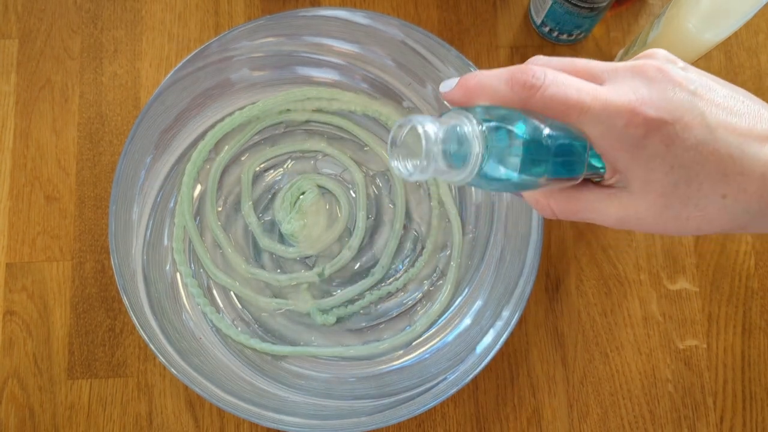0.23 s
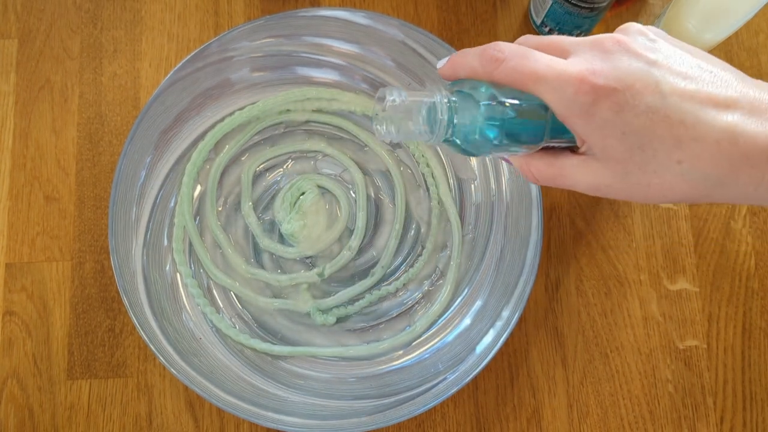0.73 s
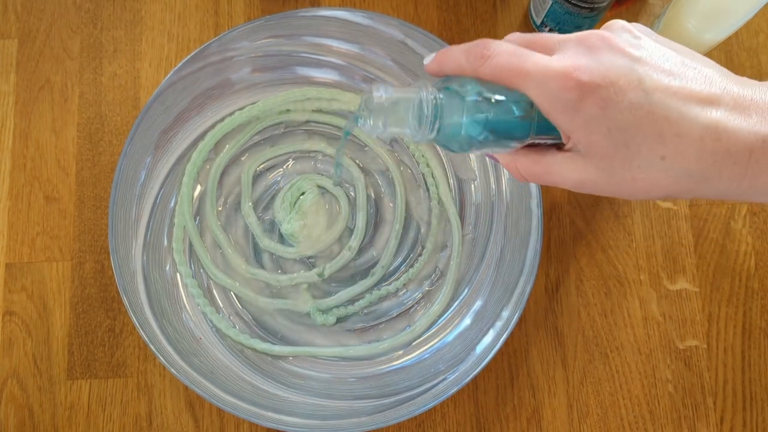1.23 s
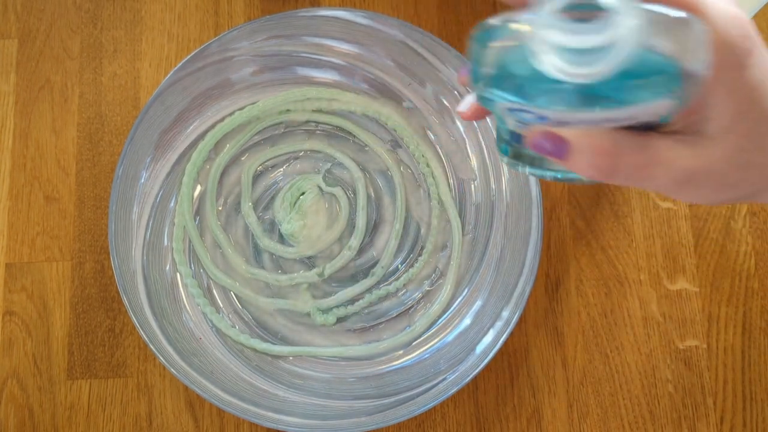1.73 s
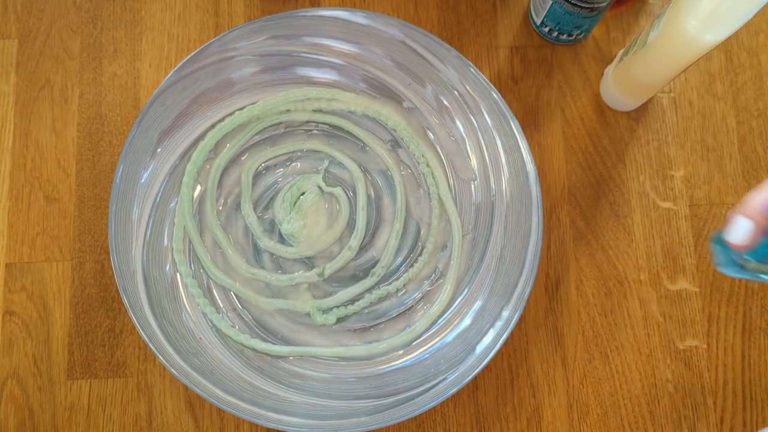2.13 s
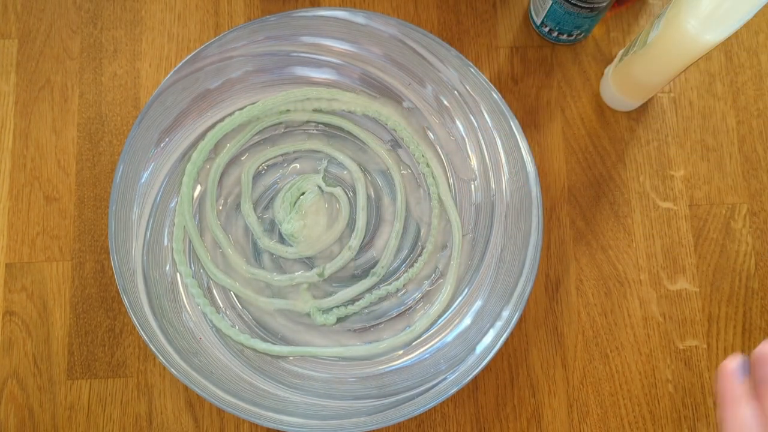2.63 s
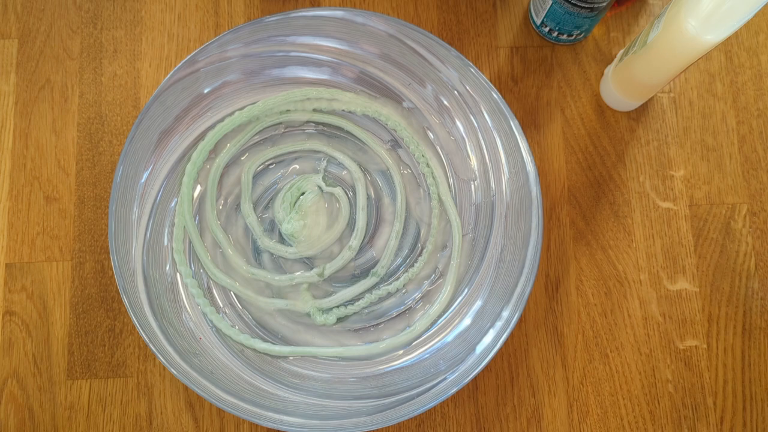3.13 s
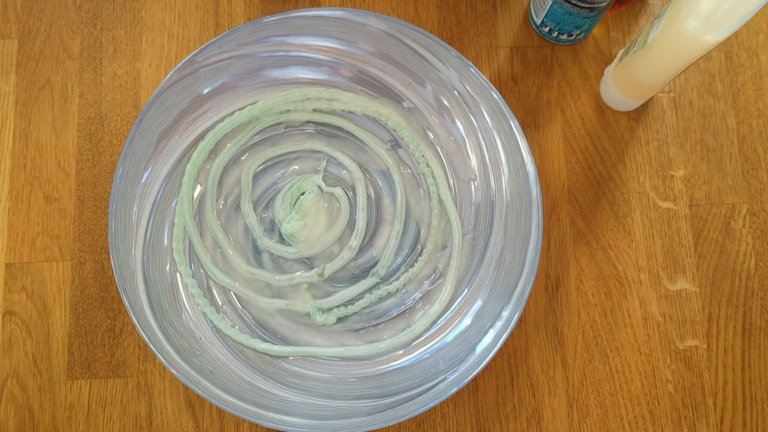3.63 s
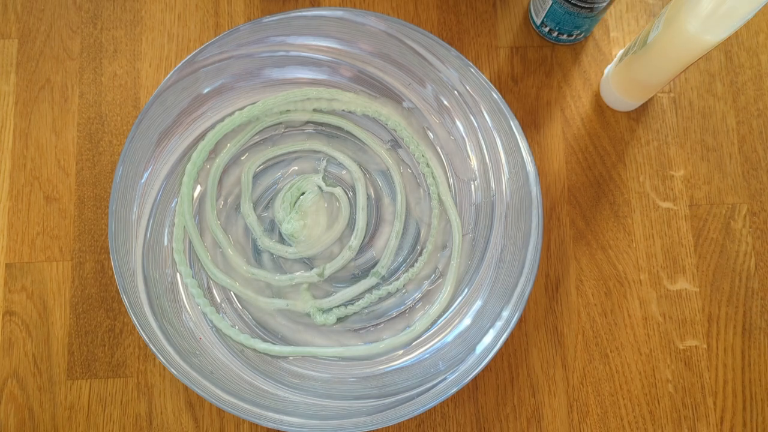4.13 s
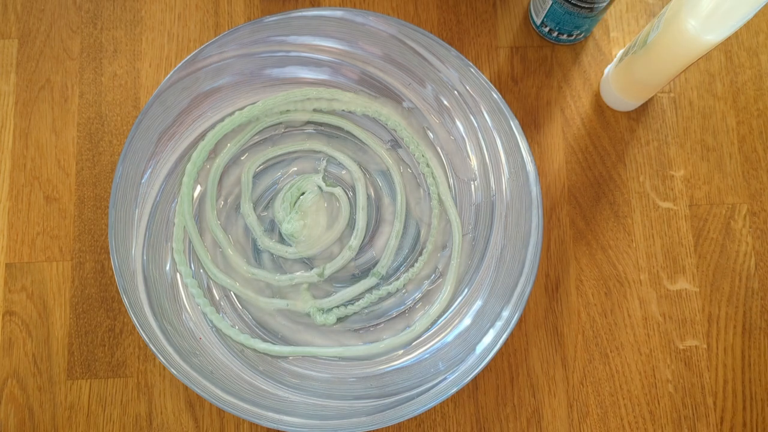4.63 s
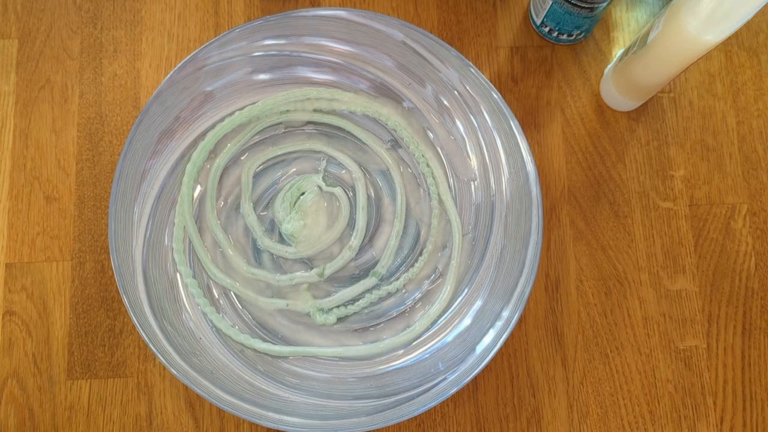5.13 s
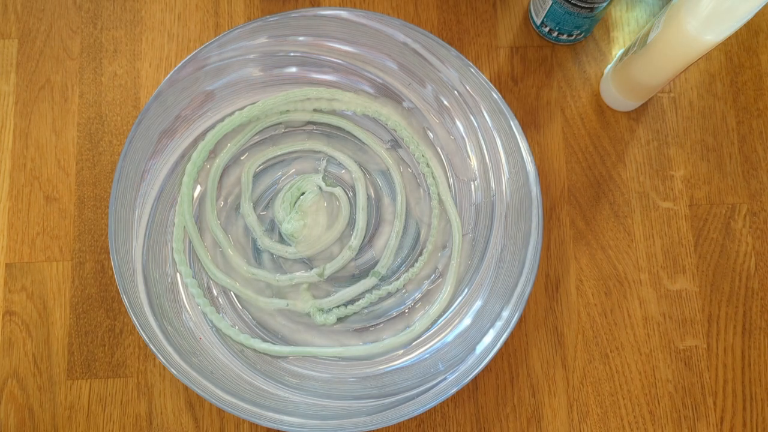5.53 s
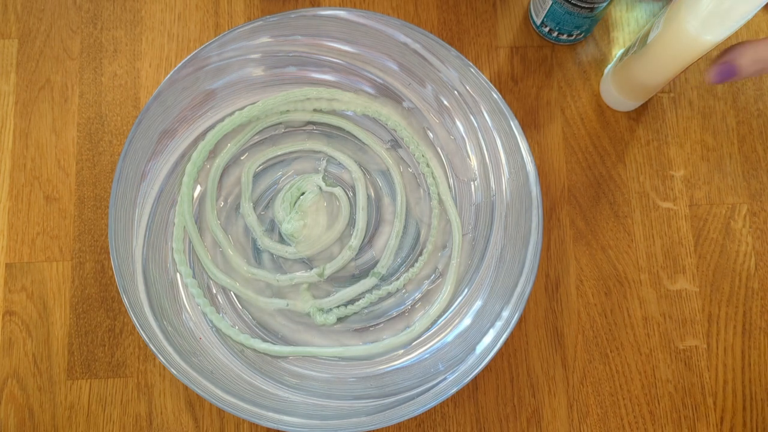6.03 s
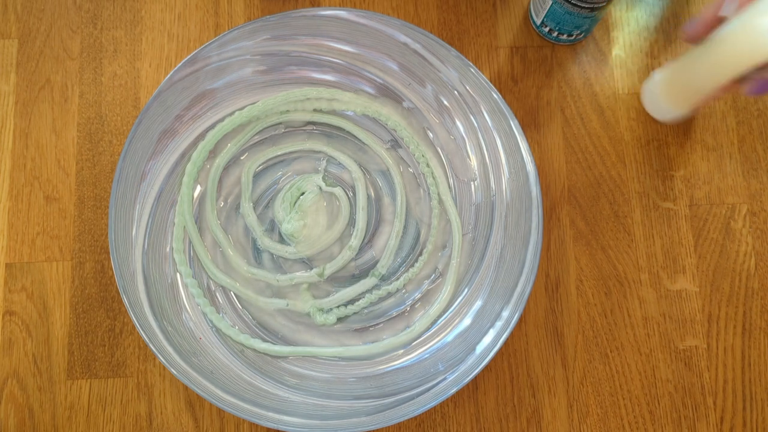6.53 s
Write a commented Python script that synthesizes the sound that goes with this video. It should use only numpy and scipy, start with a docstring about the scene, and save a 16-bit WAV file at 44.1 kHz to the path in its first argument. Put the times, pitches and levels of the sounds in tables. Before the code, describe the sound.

Close up in a small, quiet room with faint mains hum, a nearly empty plastic gel bottle sputters softly, then pops harder with tiny wet chirps. A quick cluster of falling gulps and squelches follows. Hands brush plastic, a cap snaps, the table gets light knocks, then a full bottle lands with a deep, rattling thump. Finally there are small knocks and rubs as a bottle is picked up.

```python
"""A small room with a faint mains hum, heard from close above a glass bowl on a wooden table.
A squeeze bottle of gel sputters (bursting films chirp, a struck body rings), then gurgles as it is put
aside (an air pocket rings ever lower). Hands slide over plastic (shaped grains of noise), a cap snaps
(damped noise), a full bottle thumps down (table modes) and another is picked up."""
import sys
import numpy as np
from scipy import signal
from scipy.fft import rfft, irfft
from scipy.io import wavfile

SR = 44100
rng = np.random.default_rng(int(sys.argv[2]) if len(sys.argv) > 2 else 0)


def log_audio(samples):
    """Write samples as a 16-bit WAV file to the path given in sys.argv[1]."""
    # one column per channel
    frames = np.atleast_2d(samples).T
    # limit to full scale, then quantise
    limited = np.clip(frames, -1, 1)
    pcm = np.round(limited * 32767).astype(np.int16)
    wavfile.write(sys.argv[1], SR, pcm)


N = 299880
TIME = np.arange(N) / SR
TAIL = TIME[:SR * 3 // 4]  # time axis of one decaying sound

# Source levels are given before the gains of scene(); t60 is the time to fall by 60 dB.

# Air bursting through the nozzle, or the gel bottle's base touching down.
# Each row: start in seconds, ring level in dB, spit level in dB.
POPS = [(.068, -50, -53), (1.331, -39.5, -38), (3.7479, -50.5, -82)]
# Resonances of the gel bottle. Each row: frequency in Hz, relative level in dB, t60 in seconds.
BOTTLE_MODES = [(531, 10, 0.108), (597, -3, 0.19), (719, 0, 0.11), (880, -1.5, 0.057), (1122, -2, 0.0663),
                (1250, -7.5, 0.12), (1303, -9.5, 0.12), (1450, -28, .06), (2014, -2.5, 0.074),
                (2080, 2.5, 0.097), (3440, -6.5, 0.15), (4290, -9, 0.087), (4400, -9.5, 0.16),
                (9600, -13, 0.021)]
# Spectrum of the spitting air. Each row: frequency in Hz, relative level in dB.
SPIT_SPECTRUM = [(150, -40), (380, 2), (550, 7.5), (900, 2), (1250, 1.5), (2200, -3.5), (3000, -7.5),
                 (4300, -4), (5300, -16), (7500, -7.5), (9400, 7), (11500, -11.5), (16000, -15)]
# Froth fizzing at the nozzle during a squeeze. Each row: start in seconds, length in seconds, level in dB.
FROTHS = [(0.065, 0.035, -60), (0.23, .04, -71.5), (1.271, .165, -66), (1.447, 0.033, -60)]
FROTH_ATTACK_S, FROTH_RELEASE_S = .05, .13  # time to rise and to fall by 60 dB

# Gel films bursting at the nozzle.
# Each row: start in seconds, starting pitch in Hz, level in dB, t60 in seconds.
FILMS = [(0.0922, 11300, -56, 0.015), (.153, 2800, -62, 0.0095), (0.1746, 8580, -52.5, 0.022),
         (.2115, 2350, -63.5, .013), (0.238, 12400, -60.5, .009), (.2703, 11800, -62.5, .012),
         (1.2724, 15400, -44.5, 0.0075), (1.415, 8600, -56, .007), (1.4494, 10900, -47, .013),
         (1.4642, 10100, -49, .01), (1.469, 3480, -56, .022), (1.4705, 11200, -50, .005),
         (1.4978, 4890, -41.5, .011), (1.4996, 6100, -40.5, 0.013)]
# A shrinking film climbs this share of the octaves up to the smallest bubble's pitch.
SMALLEST_HZ, SHRINK = 16000, 0.47

# Air gulping into the bottle, each gulp throwing a spurt of liquid.
# Each row: start in seconds, glug level in dB, glug t60 in seconds, spurt level in dB.
GULPS = [(2.5502, -50, 0.08, -49), (2.57, -41.5, .11, -60), (2.596, -39.5, 0.13, -53.5),
         (2.62, -37, 0.27, -45), (2.632, -51.5, .05, -41), (2.6544, -30, 0.036, -43),
         (2.705, -34.5, 0.03, -37.5), (2.7189, -42, .09, -35)]
POCKET_START_HZ, POCKET_END_HZ = 628, 388  # the air pocket grows, so its pitch drops
POCKET_OPENS_S, POCKET_GROW_S = 2.612, .009  # midpoint and time constant of that growth
GLUG_RISE = -0.073  # octaves per t60
SPURT_T60_S, SPURT_TILT = 0.04, -1.1  # tilt in dB per octave
# Wet crackle around each spurt; its level in dB is relative to the spurt before the final balance.
CRACKLE_DB, CRACKLE_ATTACK_S, CRACKLE_HOLD_S, CRACKLE_RELEASE_S = -6, 0.035, .004, .1
# Spectrum of spurt and crackle. Each row: frequency in Hz, relative level in dB.
SQUELCH_SPECTRUM = [(200, -24), (500, -3), (950, -6.5), (1650, -12.5), (2250, 2), (3000, -6), (4500, -8.5),
                    (5500, -16), (8000, -18), (12000, -18.5), (16000, -28)]
# Resonances set singing by the crackle, at their pitch once the pocket has grown.
# Each row: frequency in Hz, relative level in dB, t60 in seconds.
SQUELCH_MODES = [(2087, 1.5, 0.15), (1964, -1.5, 0.11), (2275, -1, 0.066), (2378, 0, 0.05), (2920, -5, .08),
                 (3704, -3.5, 0.076)]
SING_START = 1.14  # pitch ratio of these resonances while the pocket is small

# Single light blows on the table.
# Each row: start in seconds, thud level in dB, clack level in dB, hardness in Hz (corner of the clack).
KNOCKS = [(2.818, -56, -64, 900), (3.624, -48.5, -75, 600), (3.7075, -39.5, -56, 620),
          (3.7506, -46, -47, 507), (4.75, -47.5, -56.5, 897), (5.56, -68, -59, 3100),
          (5.591, -61, -59.5, 1503), (6.168, -62.5, -65, 2960), (6.294, -49, -35.5, 1970),
          (6.553, -61, -62.5, 1200)]
# Resonances of the wooden table top. Each row: frequency in Hz, relative level in dB, t60 in seconds.
TABLE_MODES = [(143.6, 0, 0.16), (169, -3, 0.13), (183, 4, 0.06), (213.3, 0, 0.17), (231.7, -21.5, 0.82),
               (272, -10, 0.26), (319.2, -1.5, 0.081), (364, -11.5, 0.21), (457.8, -18.5, 0.29),
               (556, -24, .12)]
# Resonances of a full bottle's base. Each row: frequency in Hz, relative level in dB, t60 in seconds.
BASE_MODES = [(860, 0, 0.049), (930, 6, 0.083), (1036, -1, 0.037), (1268, -2.5, 0.087), (1477, 5.5, 0.047),
              (1755, -4.5, 0.081), (2275, -0.5, 0.066), (2410, -2.5, 0.15), (2540, -6.5, 0.12),
              (2700, -7, .1), (3300, 0.5, 0.064)]
# Spectrum of the clack. Each row: frequency in Hz, relative level in dB.
CLACK_SPECTRUM = [(60, -42), (150, -17), (300, 8), (550, 0), (750, -3), (1200, -2), (1700, -0.5),
                  (2700, -7), (3300, -7.5), (4500, -17.5), (8000, -16.5), (16000, -15)]
# A full bottle lands edge first, then flat, and rocks on between the two.
LANDS_S, EDGE_TO_FLAT_S, ROCK_PERIOD_S = 5.1427, .0063, .0213
LANDING_DB, ROCKING_DB = -18.5, -28  # thud of the full weight, and of every other contact
LANDING_CLACK_DB, CLACK_LOSS_DB, LANDING_HARD_HZ = -35.5, 6, 3500  # clack, its loss per rock, hardness

# A plastic cap catching and snapping.
# Each row: start in seconds, level in dB, t60 in seconds, tilt in dB per octave.
SNAPS = [(3.4688, -45, 0.16, -1), (3.524, -42.5, 0.15, -0.5), (3.5448, -32.5, .007, .5),
         (3.5462, -29.5, .007, 0), (3.55, -34.5, 0.023, -3.5), (3.563, -39.5, 0.098, 0)]
# Spectrum of the cap before tilting. Each row: frequency in Hz, relative level in dB.
CAP_SPECTRUM = [(70, -38.5), (130, -14.5), (190, 9.5), (290, -3), (380, 5.5), (550, -2.5), (1000, 4),
                (1600, -4), (2500, 0), (4300, -1), (6500, -7), (9000, -15), (16000, -18.5)]

# Strokes of a hand over plastic.
# Each row: start in seconds, length in seconds, rasp level in dB, hiss level in dB.
RUBS = [(2.008, 0.45, -79.5, -91.5), (2.926, 0.048, -62.5, -69.5), (3.015, .03, -62, -67),
        (3.119, .07, -72, -69.5), (3.255, 0.33, -80, -90), (3.468, .02, -65, -76), (3.809, 0.44, -80, -89),
        (4.523, .2, -80.5, -92), (4.744, 0.22, -71.5, -80), (5.004, 0.036, -69, -70),
        (5.318, 0.043, -74, -81.5), (6.217, 0.057, -61.5, -78), (6.288, 0.014, -58.5, -69.5),
        (6.349, 0.029, -57, -71.5), (6.518, 0.036, -75.5, -87)]
RUB_ATTACK_S, RUB_RELEASE_S = 0.063, 0.2  # time to rise and to fall by 60 dB
# Spectrum of the rasp. Each row: frequency in Hz, relative level in dB.
RASP_SPECTRUM = [(150, -7), (350, 3.5), (900, -6.5), (1600, -5), (2200, -4), (3300, -6.5), (4300, -8.5),
                 (5500, -20.5), (8000, -28)]
# Spectrum of the hiss. Each row: frequency in Hz, relative level in dB.
HISS_SPECTRUM = [(3000, -29), (5000, -2.5), (6500, 3.5), (8000, -6), (10000, -2), (16000, -7)]
# Skin catching on plastic. Each row: start in seconds, centre pitch in Hz, level in dB.
SQUEAKS = [(2.926, 3300, -59), (2.96, 3680, -58.5), (2.992, 2610, -61), (4.866, 3420, -69),
           (6.214, 3040, -61)]
SQUEAK_T60_S = 0.14

# Partials of the mains hum. Each row: mean frequency in Hz, level in dB before wavering and a common cut.
HUM = [(49.5, -75), (99, -74.5), (139.5, -70.5), (185, -87), (230, -82.5), (296, -83.5), (367, -80.5),
       (549, -91), (641, -87.5)]
# Spectrum of the room air. Each row: frequency in Hz, relative level in dB.
AIR_SPECTRUM = [(20, -32), (50, -10), (90, -3.5), (140, 3), (200, -9), (370, -11), (600, -17), (1200, -25),
                (4000, -33.5), (16000, -40.5)]
AIR_DB = -70.5
# Decay of the room. Each row: frequency in Hz, t60 in seconds.
ROOM_T60 = [(200, .42), (500, 0.31), (1500, 0.36), (4000, 0.34), (7000, .27), (16000, 0.35)]
# Stereo width of diffuse sound. Each row: frequency in Hz, side minus mid in dB.
WIDTH = [(30, -12), (120, -10), (250, -8.5), (500, -2.5), (1000, 1), (16000, -2.5)]
TOP_HZ = 16300


def pops():
    """Impulsive excitation: spitting air or a touch leaves the bottle's modes ringing; froth fizzes on."""
    out = np.zeros(N)
    for s, ring_db, spit_db in POPS:
        spit = burst(SPIT_SPECTRUM, 0.019) + amp(-18.5) * burst(SPIT_SPECTRUM, .12)
        body = highpass(ring(BOTTLE_MODES), 340)
        add(out, s, blow(body, ring_db) + blow(spit, spit_db))
    froth_gain = sum(amp(db) * swell(s, length, FROTH_ATTACK_S, FROTH_RELEASE_S)
                     for s, length, db in FROTHS)
    fizz = colour(grains(2000, 2.9), [(2000, -26.5), (5000, -1.0), (9000, 5.5), (16000, 2)])
    return out + froth_gain * unit(fizz)


def films():
    """Bubble resonance: a bursting film shrinks and chirps upward, the large ones most."""
    rows = [(s, hz, db, t60, SHRINK * np.log2(SMALLEST_HZ / hz)) for s, hz, db, t60 in FILMS]
    return highpass(bubbles(rows, onset_cycles=0.81, tear_db=-6, tear_share=0.86), 1500)


def glugs():
    """Cavity resonance: every gulp rings the same air pocket, lower as the pocket grows."""
    rows = []
    for s, db, t60, _ in GULPS:
        hz = POCKET_START_HZ + growth(s) * (POCKET_END_HZ - POCKET_START_HZ)
        rows.append((s, hz, db, t60, GLUG_RISE))
    return bubbles(rows, onset_cycles=1.7, tear_db=-13.5, tear_share=0.79)


def growth(s):
    """Logistic growth: the share of its full size the air pocket has reached at time s, 0 to 1."""
    return (1 + np.tanh((s - POCKET_OPENS_S) / POCKET_GROW_S / 2)) / 2


def bubbles(rows, onset_cycles, tear_db, tear_share):
    """Damped oscillation: each air pocket tears open with a tick and rings with a gliding pitch."""
    out = np.zeros(N)
    for s, hz, db, t60, rise in rows:
        pitch = np.minimum(hz * 2 ** (rise * np.minimum(TAIL / t60, 1)), SR / 2)
        onset = 1 - np.exp(-TAIL * hz / onset_cycles)
        tone = np.sin(2 * np.pi * np.cumsum(pitch) / SR) * fade(t60) * onset
        tear = burst([(hz / 4, -24), (hz, 0), (hz * 4, -24)], t60 * tear_share)
        add(out, s, blow(tone, db) + blow(tear, db + tear_db))
    return out


def squelch():
    """Driven resonance: wet crackle around each spurt sets modes singing, lower as the pocket grows."""
    crackle, singing, ticks = 0, 0, grains(4000, 1.1)
    for s, _, _, db in GULPS:
        envelope = swell(s, CRACKLE_HOLD_S, CRACKLE_ATTACK_S, CRACKLE_RELEASE_S)
        spray = ticks * amp(db + CRACKLE_DB) * envelope
        raised = SING_START ** (1 - growth(s))
        modes = [(hz * raised, mode_db, t60) for hz, mode_db, t60 in SQUELCH_MODES]
        crackle = crackle + spray
        singing = singing + signal.fftconvolve(spray, ring(modes))[:N]
    spurts = bursts([(s, db, SPURT_T60_S, SPURT_TILT) for s, _, _, db in GULPS], SQUELCH_SPECTRUM)
    wet = amp(1.5) * unit(colour(crackle, SQUELCH_SPECTRUM)) + amp(-1.5) * unit(singing)
    return spurts + np.std(crackle) * wet


def knocks():
    """Modal impact: a base clacks, and each contact rings the table top and nudges the whole table."""
    out = np.zeros(N)
    table, base = highpass(ring(TABLE_MODES), 127), ring(BASE_MODES)
    frame = ring([(34, 0.11, .4), (57.5, 2, 0.35)])  # the table sways on its legs
    for s, thud_db, clack_db, hard_hz in KNOCKS + landing(count=3):
        clack = unit(burst(CLACK_SPECTRUM, .06)) + amp(-5.5) * unit(base)
        grit = burst([(2500, -23.0), (6000, 6.0), (16000, -0.5)], 0.056)
        # the softer the contact, the duller the blow
        add(out, s, blow(lowpass(table, hard_hz / 2), thud_db) + blow(frame, thud_db - 26.0))
        add(out, s, blow(lowpass(clack, hard_hz), clack_db) + blow(grit, clack_db - 25))
    return out


def landing(count):
    """Rocking contact: the full bottle meets the table edge-on, then flat, as rows like KNOCKS."""
    rows = []
    for rock in range(count):
        edge_s = LANDS_S + rock * ROCK_PERIOD_S
        clack_db = LANDING_CLACK_DB - rock * CLACK_LOSS_DB
        flat_db = ROCKING_DB if rock else LANDING_DB
        rows.append((edge_s, ROCKING_DB, clack_db, LANDING_HARD_HZ))
        rows.append((edge_s + EDGE_TO_FLAT_S, flat_db, clack_db, LANDING_HARD_HZ))
    return rows


def snaps():
    """Sudden release: a plastic cap catches and snaps in short cracks of damped noise."""
    return highpass(bursts(SNAPS, CAP_SPECTRUM), 150)


def rubs():
    """Stick-slip friction: skin slips on plastic in uneven steps, with rasp, fine hiss and squeaks."""
    rasp = unit(colour(grains(6000, 4.7), RASP_SPECTRUM))
    hiss = unit(colour(grains(15000, 0.97), HISS_SPECTRUM))
    grip = amp(1.1 * unit(lowpass(rng.standard_normal(N), 60)))
    out = np.zeros(N)
    for s, length, rasp_db, hiss_db in RUBS:
        stroke = swell(s, length, RUB_ATTACK_S, RUB_RELEASE_S)
        out += stroke * (amp(rasp_db) * grip * rasp + amp(hiss_db) * hiss)
    for s, hz, db in SQUEAKS:
        # slow noise on the carrier makes the tone hoarse
        squeak = lowpass(rng.standard_normal(len(TAIL)), hz / 20) * np.sin(2 * np.pi * hz * TAIL)
        add(out, s, blow(squeak * fade(SQUEAK_T60_S), db))
    return out


def background():
    """Stationary noise and partials: still room air and a mains hum wavering in level and phase."""
    hum = 0
    for hz, db in HUM:
        waver = unit(lowpass(rng.standard_normal(N), 4.1))
        phase = 2 * np.pi * (hz * TIME + rng.random()) + 0.46 * waver
        hum = hum + amp(db + 0.9 * waver) * np.sqrt(2) * np.sin(phase)
    return amp(-1.5) * hum + amp(AIR_DB) * unit(colour(diffuse(N), AIR_SPECTRUM))


def room(x, near_db, far_db, pan_db):
    """Reverberation: direct sound, quick reflections from table and bowl, then the walls."""
    near = highpass(rng.standard_normal(len(TAIL)) * fade(0.011), 860)
    near = near * np.array([[1], [-1]])  # opposite in left and right
    noise, far = diffuse(len(TAIL)), 0
    hz, t60 = np.transpose(ROOM_T60)
    bins = np.log(np.maximum(np.arange(len(TAIL) // 2 + 1) * SR / len(TAIL), 1))
    # overlapping bands, each with its own decay
    for share, decay in zip(np.eye(len(hz)), t60):
        band = irfft(rfft(noise) * np.interp(bins, np.log(hz), share), len(TAIL))
        far = far + band * fade(decay)
    far = highpass(far * (1 - np.exp(-TAIL / .002)), 240)  # the room's tail is thin in the bass
    response = sum(amp(db) * part / np.sqrt(np.sum(part ** 2) / 2)
                   for part, db in [(near, near_db), (far, far_db)])
    response[:, 0] += 1  # direct sound
    response /= np.sqrt(np.sum(response ** 2) / 2)
    balance = amp(np.array([[pan_db], [-pan_db]]) / 2)
    return signal.fftconvolve(x[None], response, axes=1)[:, :N] * balance


def diffuse(size):
    """Diffuse field: stereo noise from all around, alike in the bass and unrelated in the treble."""
    mid, side = rng.standard_normal((2, size))
    side = colour(side, WIDTH)
    return unit(np.array([mid + side, mid - side]))


def bursts(rows, points):
    """Spectral tilt: short noisy cracks of one colour, each made brighter or duller."""
    out = np.zeros(N)
    for s, level_db, t60, tilt in rows:
        tilted = [(hz, db + tilt * np.log2(hz)) for hz, db in points]
        add(out, s, blow(burst(tilted, t60), level_db))
    return out


def burst(points, t60):
    """High modal density: many close, damped resonances struck at once amount to fading noise."""
    return colour(rng.standard_normal(len(TAIL)), points) * fade(t60)


def ring(modes):
    """Modal superposition: a struck body sounds as a sum of decaying sines."""
    return sum(amp(db) * fade(t60) * np.sin(2 * np.pi * hz * TAIL) for hz, db, t60 in modes)


def grains(rate, spread_db):
    """Random point process: tiny clicks of uneven size, on average `rate` a second."""
    size = amp(spread_db * np.minimum(rng.exponential(size=N), 3))
    return unit((rng.random(N) < rate / SR) * rng.standard_normal(N) * size)


def fade(t60):
    """Exponential decay: 60 dB lost in t60 seconds."""
    return np.exp(-np.log(1000) * TAIL / t60)


def swell(start, length, attack, release):
    """Exponential rise, hold and decay, 60 dB in attack or release seconds, floored at -120 dB."""
    early = np.maximum(start - TIME, 0)
    late = np.maximum(TIME - start - length, 0)
    return np.exp(-np.log(1000) * np.minimum(early / attack + late / release, 2))


def colour(x, points):
    """Linear filtering: a spectrum of (Hz, dB) points, joined along log frequency."""
    hz, db = np.transpose(points)
    size = x.shape[-1]
    bins = np.maximum(np.arange(size // 2 + 1) * SR / size, 1)
    return irfft(rfft(x) * amp(np.interp(np.log(bins), np.log(hz), db)), size)


def lowpass(x, hz):
    """Low-pass filter: dulls a sound or slows a random waver."""
    return signal.sosfilt(signal.butter(2, min(hz, SR / 2 - 1), fs=SR, output="sos"), x)


def highpass(x, hz):
    """High-pass filter: takes away what lies below the corner."""
    return signal.sosfilt(signal.butter(3, hz, "high", fs=SR, output="sos"), x)


def amp(db):
    """Logarithmic level: decibels to gain."""
    return 10 ** (np.asarray(db) / 20)


def unit(x):
    """Mean power: scale to rms 1."""
    return x / np.sqrt(np.mean(x ** 2))


def blow(x, db):
    """Sound exposure: scale a short sound to the energy of 10 ms at this level."""
    return x * amp(db) * np.sqrt(SR / 10 ** 2 / np.sum(x ** 2))


def add(track, s, x):
    """Superposition: mix a sound in at time s."""
    start = int(s * SR)
    track[start:start + len(x)] += x[:N - start]


def scene():
    """Superposition: each source has its own level, balance between left and right, and share of room."""
    return (room(pops(), near_db=-1.0, far_db=-5.0, pan_db=2.5) * amp(-2.5)
            + room(films(), near_db=0.0, far_db=-13.0, pan_db=3.0) * amp(-2.5)
            + room(highpass(glugs(), 170), near_db=2.0, far_db=-12.5, pan_db=4.0) * amp(0.5)
            + room(squelch(), near_db=.5, far_db=-7.0, pan_db=1.1) * amp(0.5)
            + room(knocks(), near_db=1.5, far_db=-4.5, pan_db=1.0) * amp(1.5)
            + room(snaps(), near_db=0.5, far_db=-2.0, pan_db=0.8) * amp(-1.0)
            + room(rubs(), near_db=.5, far_db=-5.0, pan_db=1.4) * amp(4.0)
            + background())


def record(dry):
    """Band limiting: a steep elliptic low-pass cuts the top."""
    return signal.sosfilt(signal.ellip(10, .2, 70, TOP_HZ, fs=SR, output="sos"), dry)


dry = scene()
out = record(dry)
log_audio(out)
```